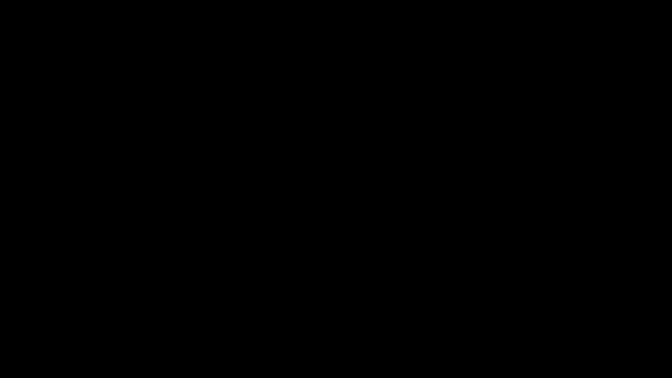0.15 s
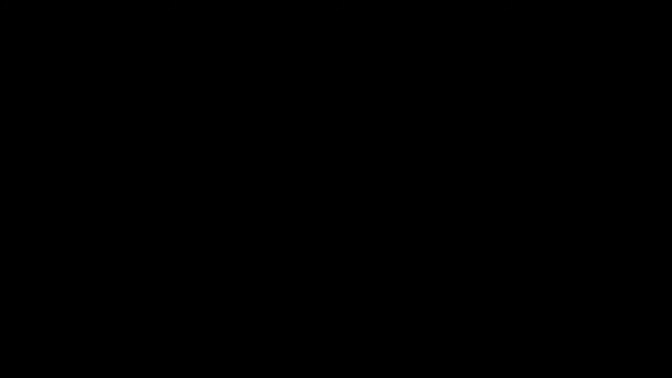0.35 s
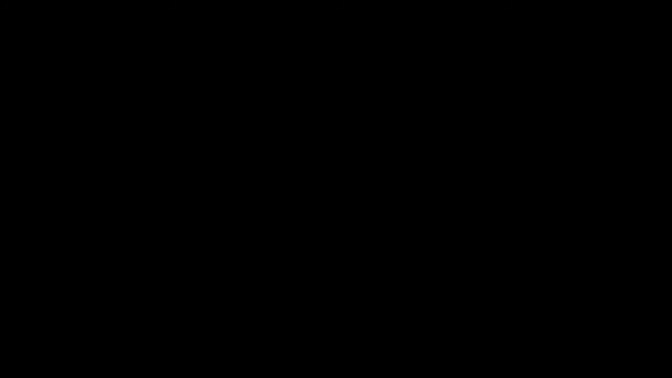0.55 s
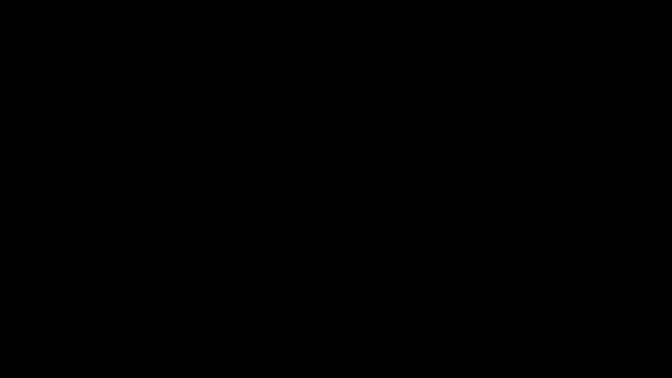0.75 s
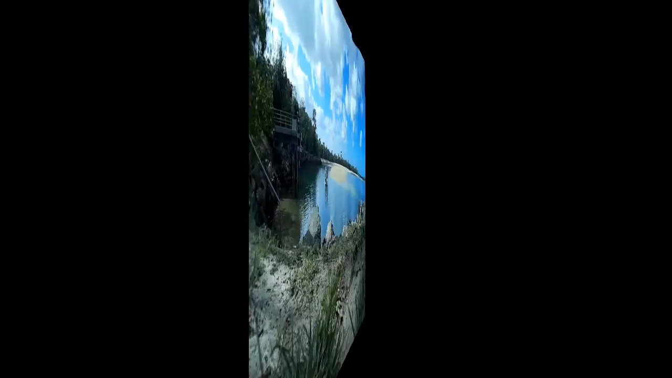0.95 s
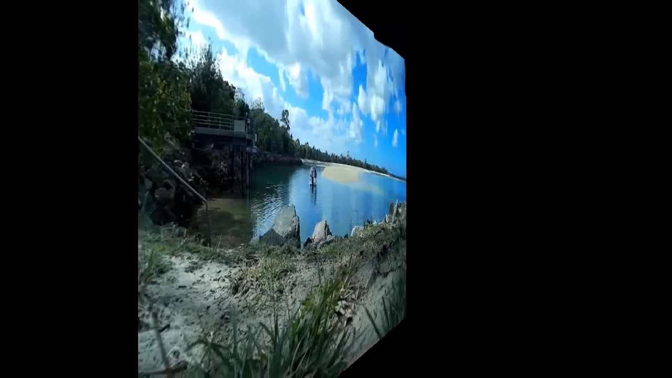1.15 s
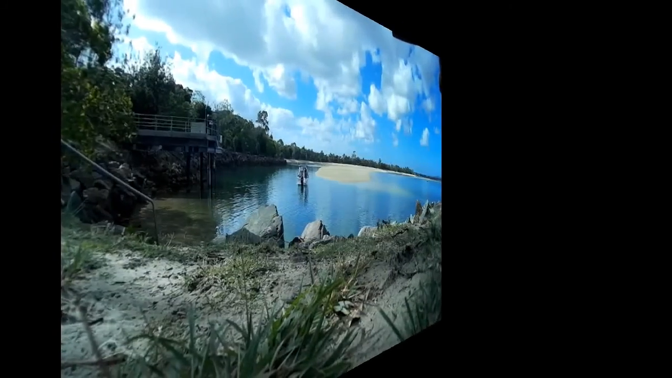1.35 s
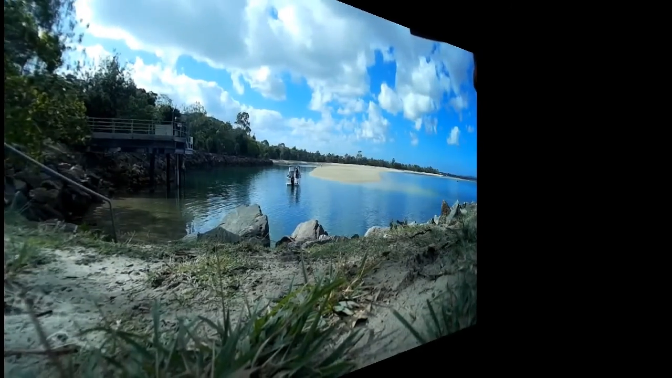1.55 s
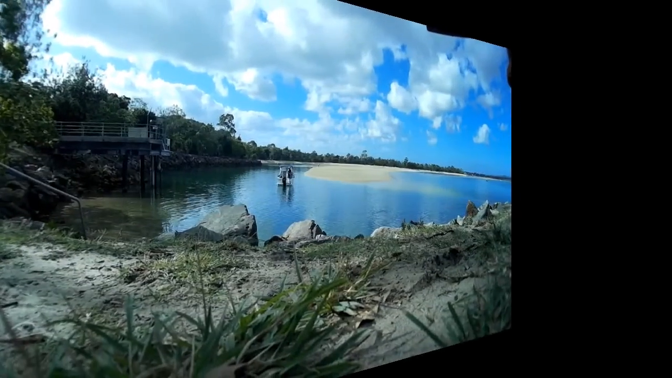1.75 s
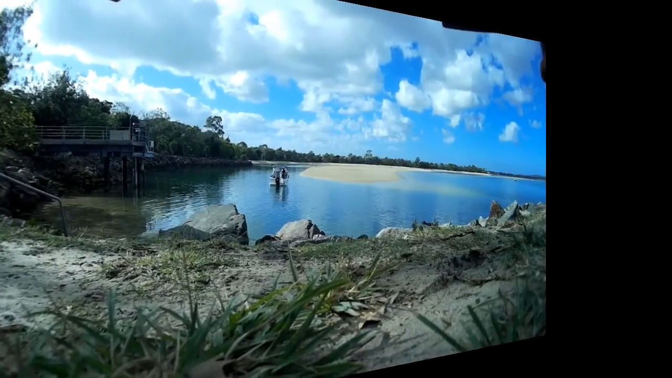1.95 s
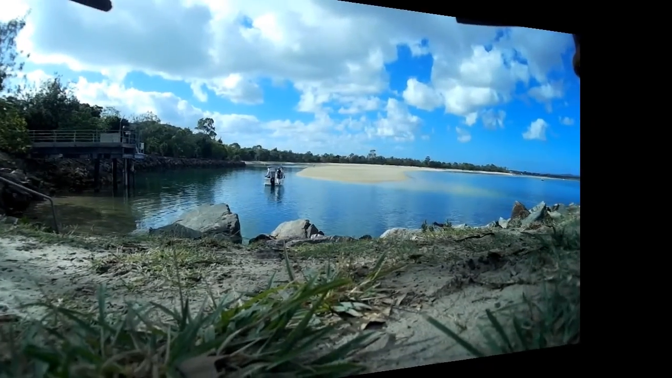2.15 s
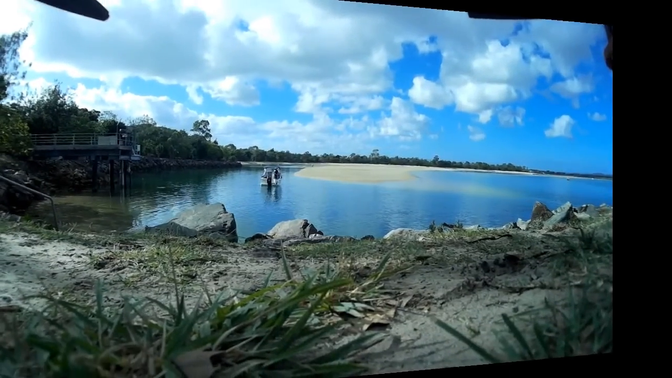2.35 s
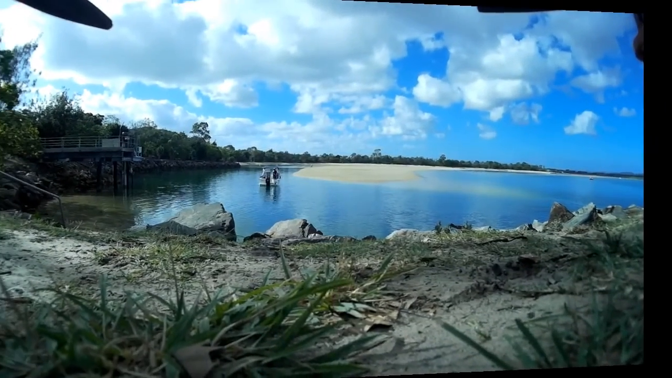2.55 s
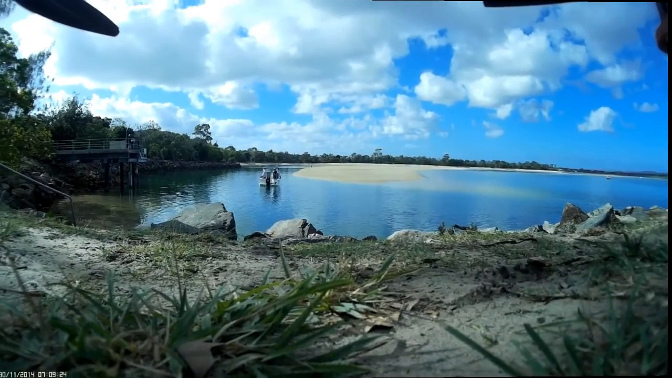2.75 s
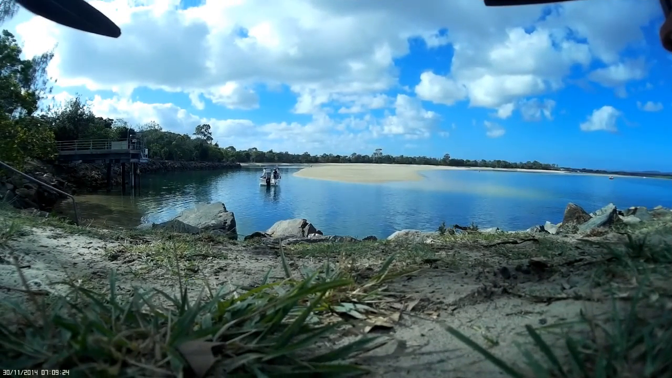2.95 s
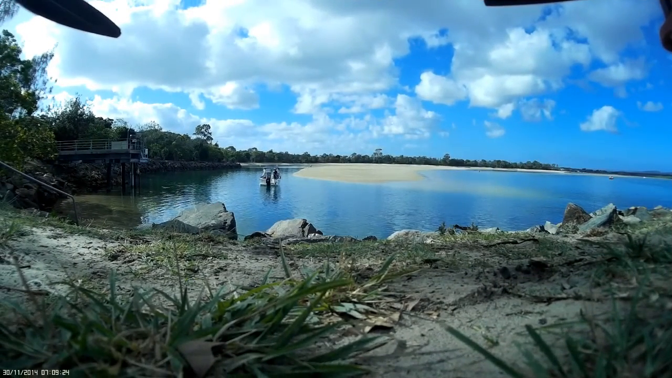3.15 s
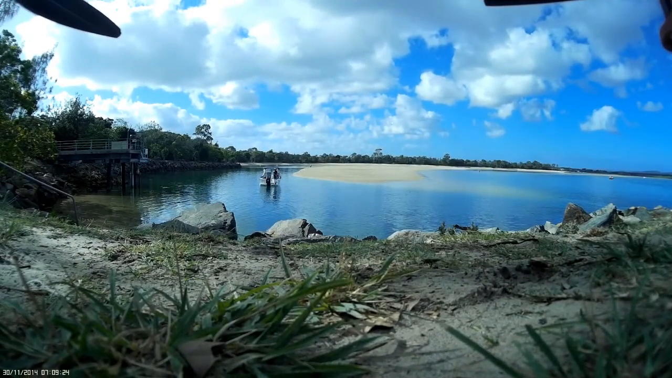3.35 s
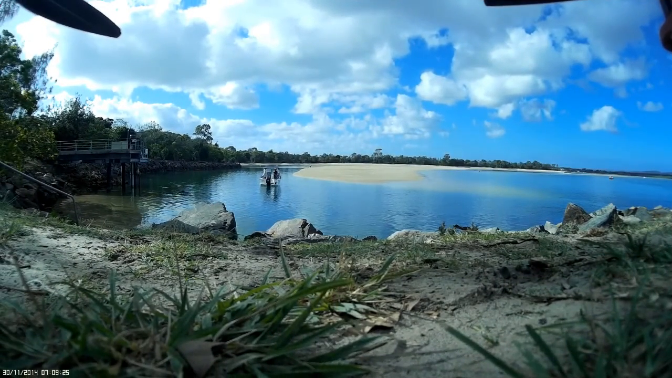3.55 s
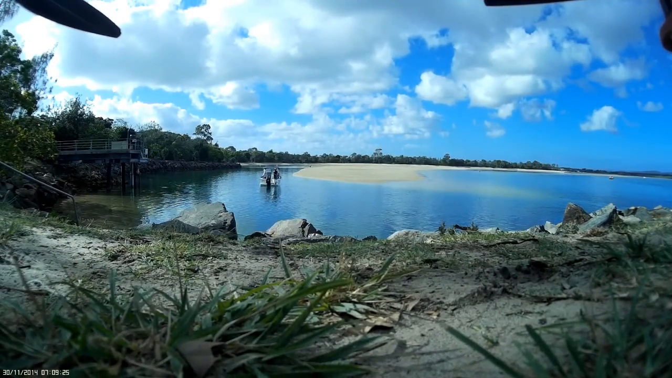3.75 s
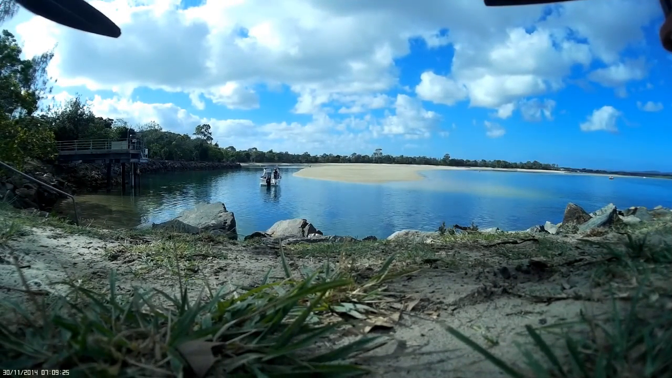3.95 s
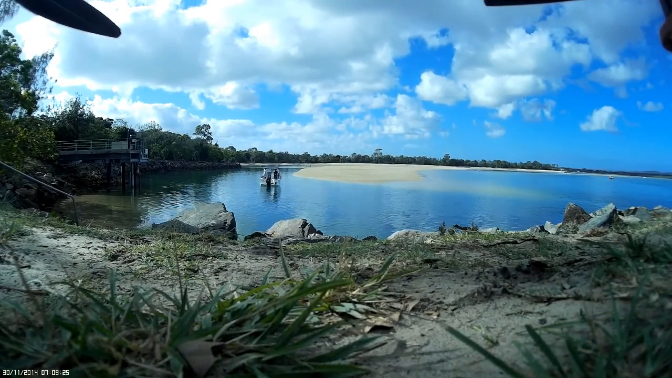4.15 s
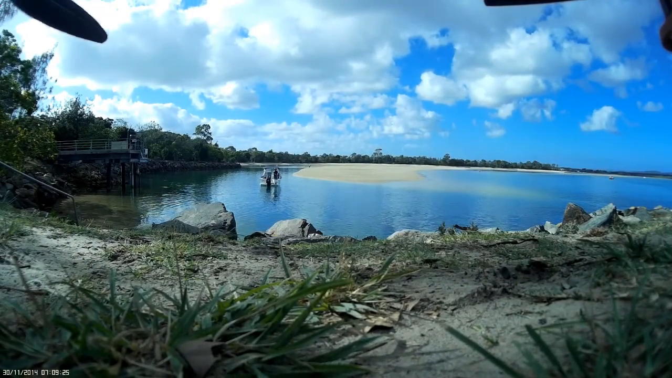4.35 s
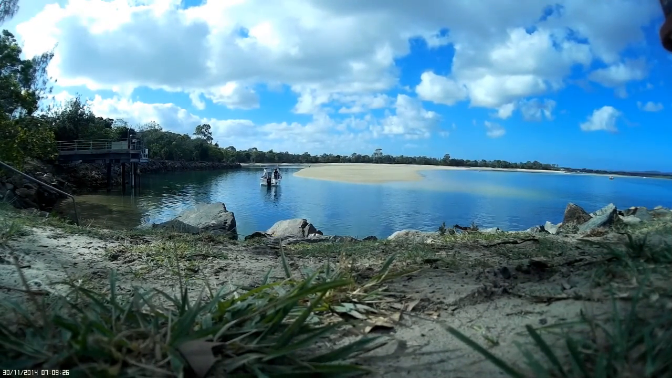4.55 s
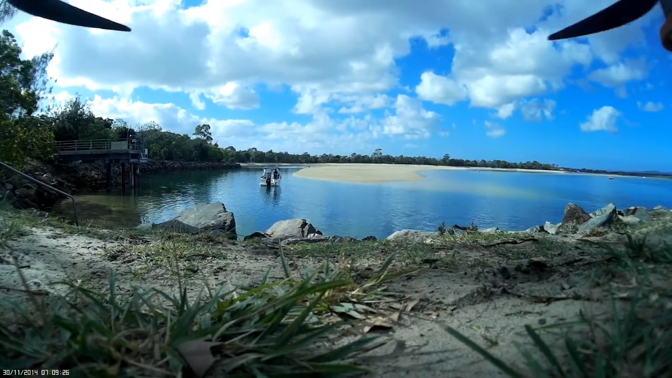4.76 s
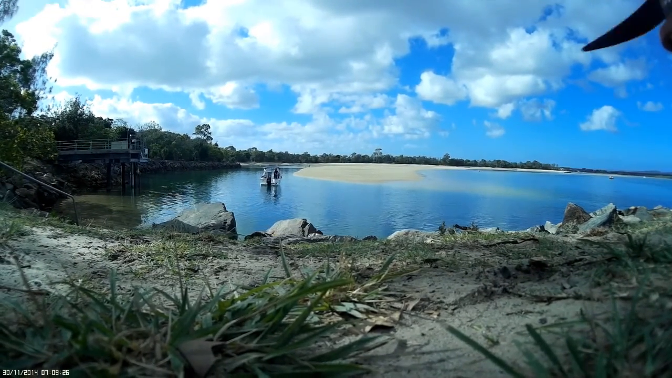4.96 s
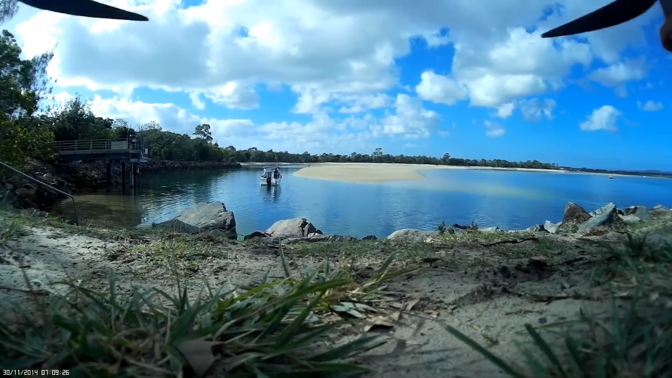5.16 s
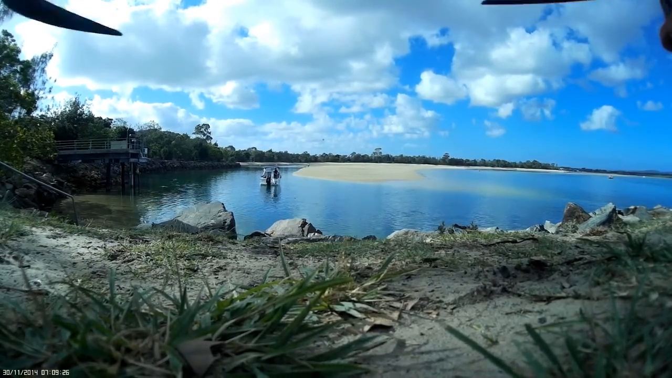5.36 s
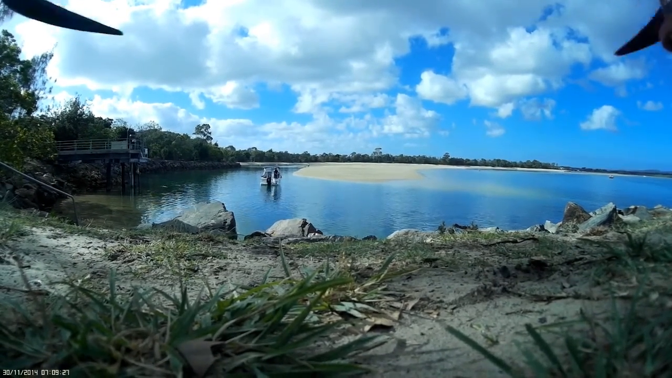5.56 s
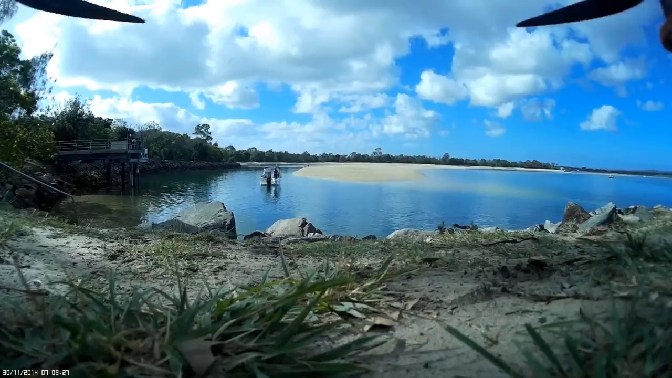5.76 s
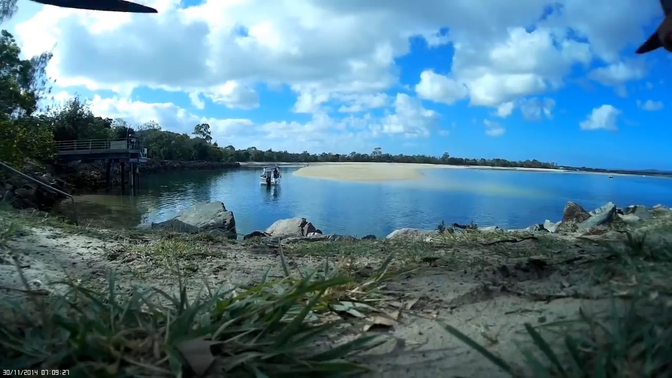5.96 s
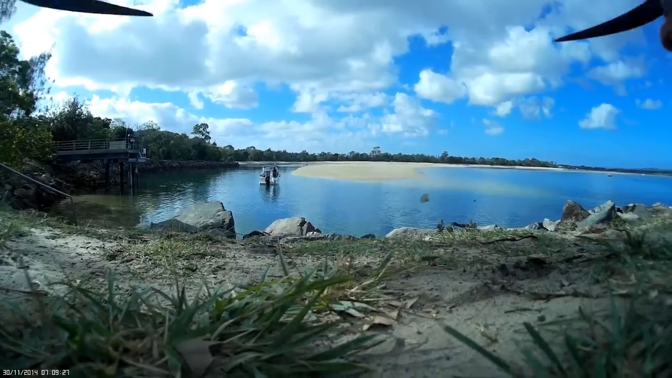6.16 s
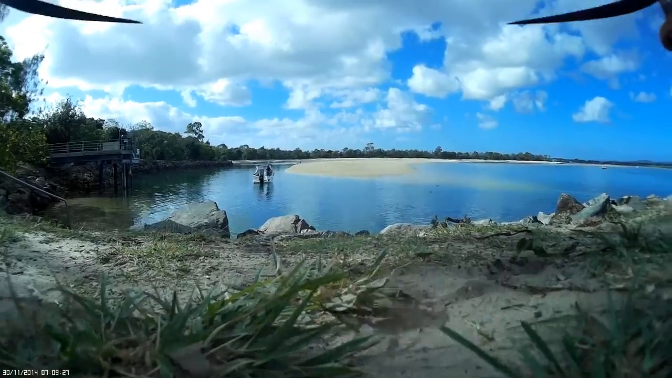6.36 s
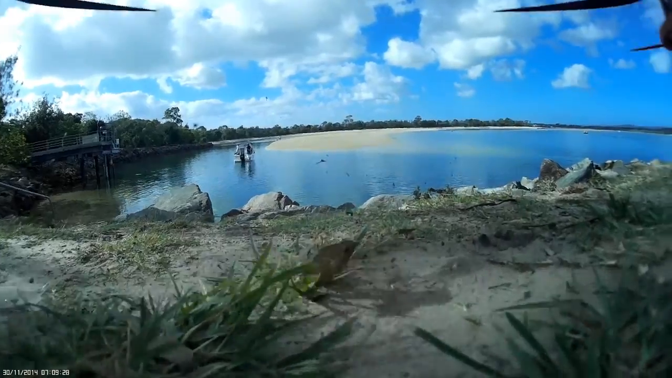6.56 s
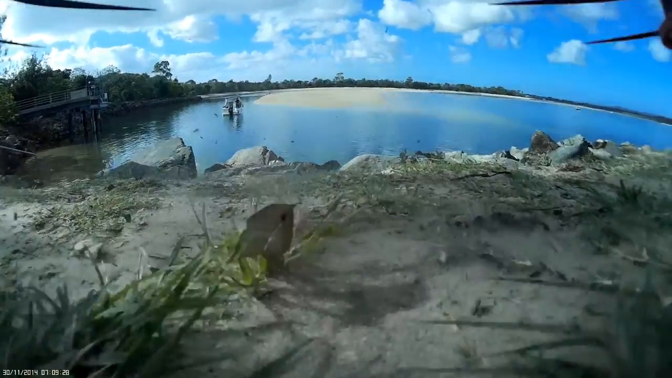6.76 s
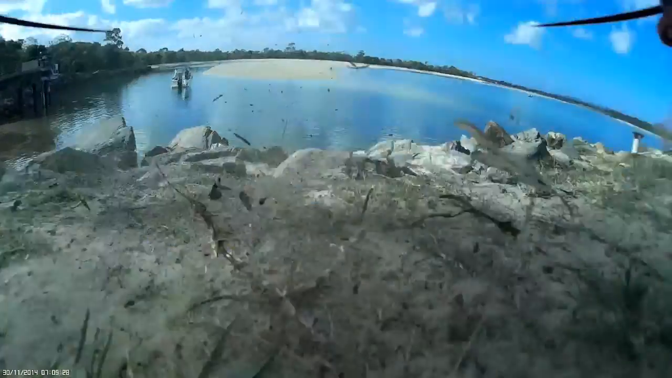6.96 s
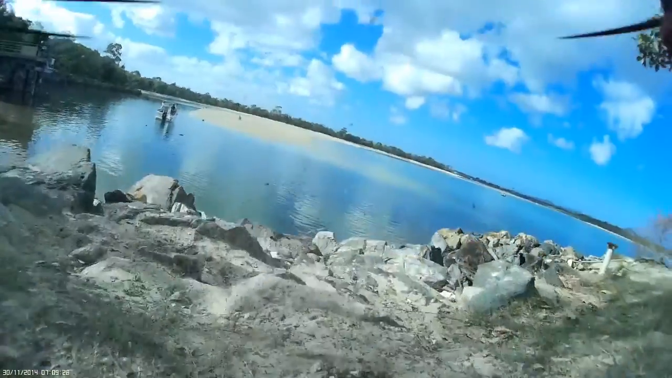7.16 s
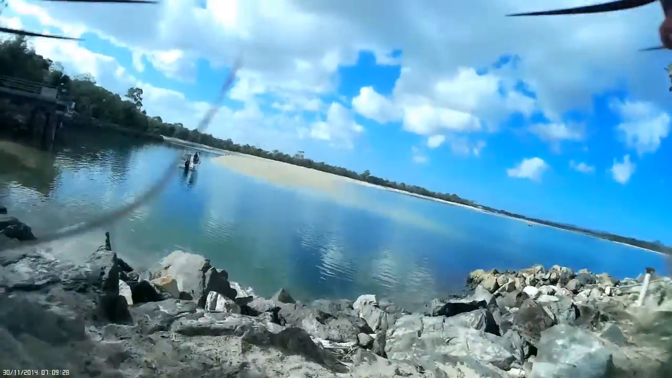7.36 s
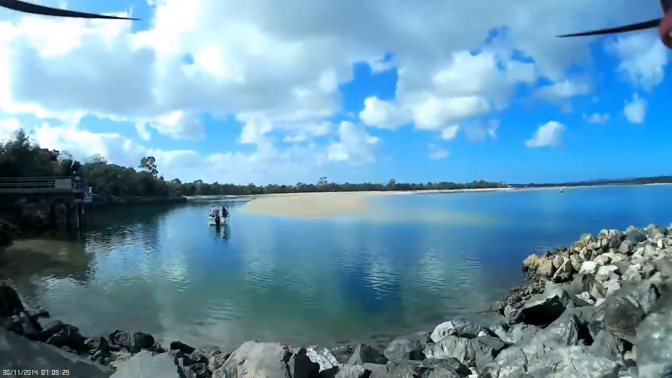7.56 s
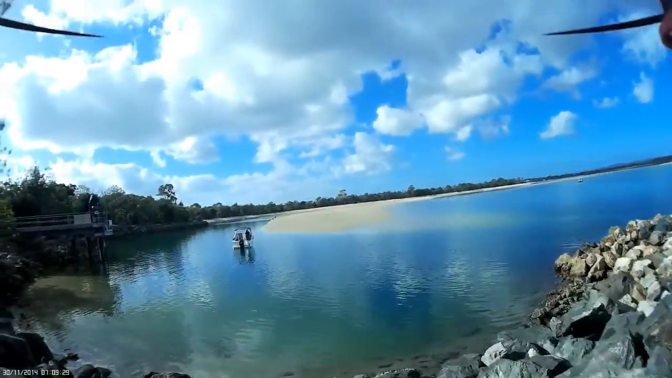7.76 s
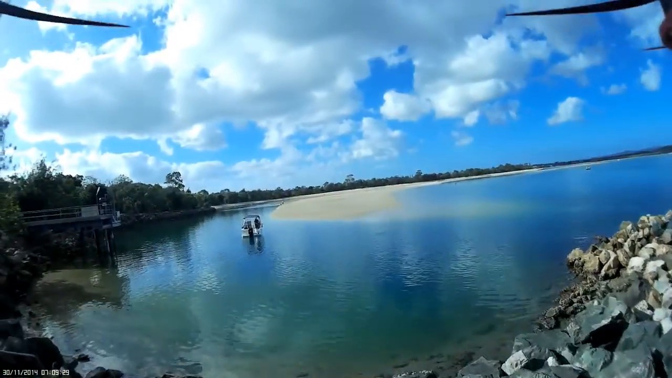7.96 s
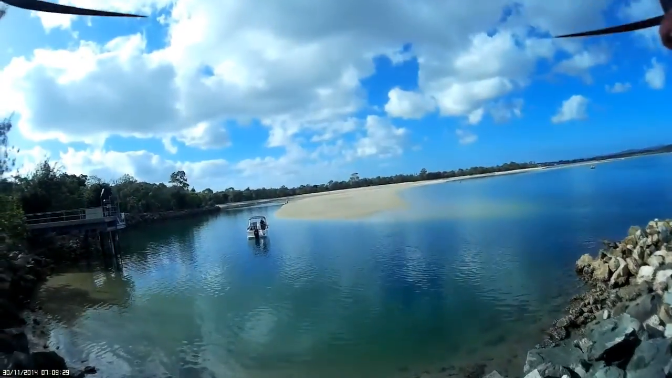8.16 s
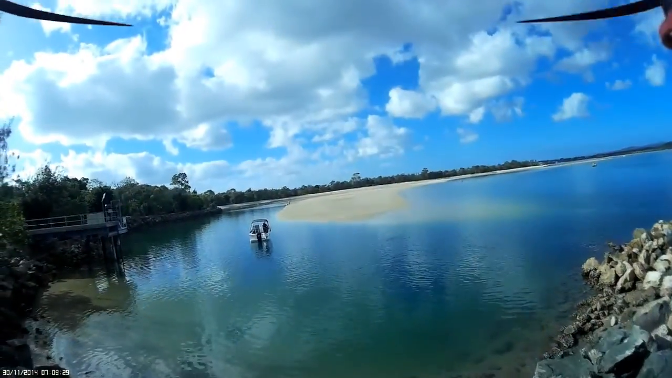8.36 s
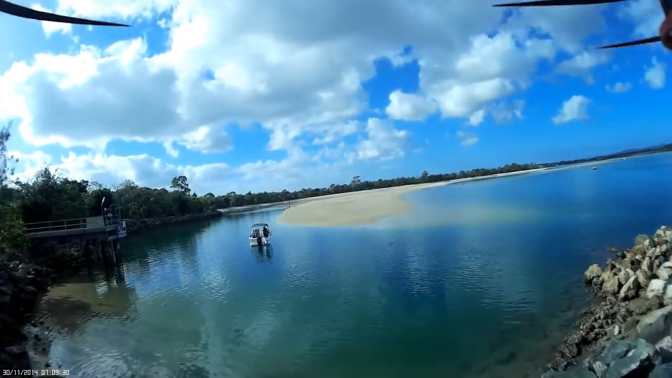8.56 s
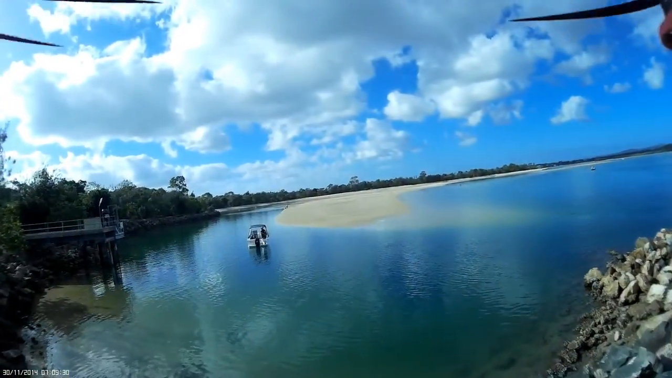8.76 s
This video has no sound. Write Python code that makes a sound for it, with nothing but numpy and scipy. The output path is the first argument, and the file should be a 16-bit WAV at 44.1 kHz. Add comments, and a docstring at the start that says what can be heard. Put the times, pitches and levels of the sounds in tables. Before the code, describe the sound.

Water splashes and a distant motorboat speeds up before a very close drone whines to life, takes off and hovers, buzzing.

```python
"""A far boat engine hums and speeds up while water laps and splashes on a sandy shore.
Then, right at the microphone, a small quadcopter wakes: its speed controllers whistle as they switch,
and the rotors spin up one after another, blades buzzing and magnets whining. The craft lifts through
its own downwash, which buffets the microphone of the camera it carries, and hovers with its rotors
beating against each other."""
import sys
import numpy as np
from scipy import signal
from scipy.fft import rfft, irfft, next_fast_len
from scipy.io import wavfile
from scipy.ndimage import uniform_filter1d, map_coordinates

SR = 44100
rng = np.random.default_rng(int(sys.argv[2]) if len(sys.argv) > 2 else 0)


def wav_record(signal):
    """Record a signal, one row per channel, as 16-bit PCM in the file named by sys.argv[1]."""
    frames = np.transpose(np.atleast_2d(signal))
    bounded = np.clip(frames, -1, 1)
    # unit amplitude maps onto the largest positive 16-bit level
    quanta = np.round(bounded * 32767).astype(np.int16)
    wavfile.write(sys.argv[1], SR, quanta)


N = 388962
t = np.arange(N) / SR


def amp(db):
    """Gain of a level in dB."""
    return 10 ** (np.asarray(db) / 20)


def unit(x):
    """Scaled to rms 1."""
    return x / np.sqrt(np.mean(x ** 2) + 1e-20)


def curves(rows):
    """One automation curve for each column after the time."""
    times, *columns = np.transpose(rows)
    return [np.interp(t, times, column) for column in columns]


def gate(start, end, fade):
    """1 from start to end, fading over `fade` seconds outside them."""
    return np.interp(t, [start - fade, start, end, end + fade], [0, 1, 1, 0])


def during(rows, fade):
    """A gate that is open while a table runs."""
    return gate(rows[0][0], rows[-1][0], fade)


def wobble(rate):
    """A smooth random curve, rate knots a second."""
    coarse = t[::64]
    knots = rng.standard_normal(int(N * rate / SR) + 4)
    return np.interp(t, coarse, map_coordinates(knots, [coarse * rate]))


def filtered(x, response):
    """x times a response of frequency."""
    size = next_fast_len(N + 8192)
    return irfft(rfft(x, size) * response(np.fft.rfftfreq(size, 1 / SR)), size)[..., :N]


def eq(x, curve, outside_db=None):
    """x through an EQ curve of (f/Hz, gain/dB) points."""
    f, db = np.transpose(curve)
    return filtered(x, lambda hz: amp(np.interp(np.log(hz + 1), np.log(f), db, outside_db, outside_db)))


def noise(spectrum, patchy_db):
    """Coloured noise of rms 1 with patches of random gain."""
    bins = signal.stft(rng.standard_normal(N), nperseg=512)[2]
    patches = uniform_filter1d(uniform_filter1d(rng.standard_normal(bins.shape), 6, 0), 12, 1)
    patchy = signal.istft(bins * amp(patchy_db * unit(patches)), nperseg=512)[1][:N]
    return unit(eq(patchy, spectrum, outside_db=-120))


def angle(hz):
    """Running phase of a moving frequency."""
    return 2 * np.pi * (np.cumsum(hz) / SR + rng.random())


def stack(phase, partials, flutter_db, drift, spread=1):
    """Fluttering multiples of a phase that drifts (radians); spread 0 lines them up as pulses."""
    phase = phase + drift * wobble(30)
    return np.sqrt(2) * sum(
        amp(db + flutter_db * wobble(13)) * np.cos(k * phase + spread * 2 * np.pi * rng.random())
        for k, db in partials)


# Colour of the camera case, and of the frame with its ringing arm (f/Hz, gain/dB)
CASE_EQ = [(40, 0), (600, -3), (1000, -4), (1700, -6.5), (2200, -7), (2800, -25), (20000, -10)]
ARM_EQ = [(1800, -35), (2100, -42), (3000, -43), (3600, -32), (4150, -21), (4600, -31), (4900, -33),
          (5500, -50)]


def rotor(moves, overtones, whines, tone_db, whine_db, drift, shake):
    """Blade tone that swells with speed, overtones, and magnet whine that follows the current."""
    hz, db = curves(moves)
    phase = angle(hz)
    swell_db = 5.5 * np.log2(hz / 201)  # per octave from hover speed
    tone = amp(db + tone_db + swell_db) * np.sqrt(2) * np.sin(phase)
    buzz = eq(amp(db) * stack(phase, overtones, flutter_db=2.5, drift=drift), CASE_EQ)
    octaves_per_s = uniform_filter1d(np.gradient(np.log2(hz)) * SR, int(.08 * SR))
    coasting_db = 15 * np.minimum(octaves_per_s, 0)  # a slowing motor whines less
    current_db = .6 * (curves(WHISTLE_FADER)[0] + 28)  # whine and whistle rise together
    arm_db = np.interp(whines[0][0] * hz, *np.transpose(ARM_EQ))
    whine = stack(phase, whines, flutter_db=1.5, drift=shake)
    whine *= amp(whine_db + coasting_db + current_db + arm_db)
    return during(moves, .026) * (tone + buzz + whine)


# Two rotors spinning up (t/s, blade rate f/Hz, level/dB)
FIRST_ROTOR = [(4.95, 83.6, -39), (5.1, 112.1, -30.5), (5.21, 124.5, -26), (5.41, 135.3, -26.5),
               (5.86, 139.8, -27), (5.94, 148.3, -26), (6.14, 176.5, -24), (6.35, 224.7, -19),
               (6.46, 231.1, -24.5), (6.6, 215, -24), (6.68, 201, -35)]
SECOND_ROTOR = [(6.3, 96, -28.5), (6.48, 138.1, -27), (6.6, 152, -26.5), (6.75, 212.5, -32.5),
                (6.86, 223.7, -30), (6.94, 260.6, -23.5), (7, 274.6, -20), (7.06, 265.9, -34)]
# Blade overtones, the halves from unequal blades (multiple of blade rate, level/dB)
RISING_BLADES = [(.5, -10), (1.5, -15), (2, -4), (2.5, -20), (3, 0.5), (4, -4), (5, -4.5), (6, -7), (7, -7),
                 (8, -5.5), (9, -14), (10, -8), (11, -34), (12, -40)]
# Magnet whine, about 42 steps a turn (multiple of blade rate, level/dB)
RISING_WHINE = [(21.27, 1.5), (21, -16), (21, -13), (18.7, -8)]


def rising_rotors():
    """Two rotors climb in pitch, one after the other."""
    return sum(rotor(moves, RISING_BLADES, RISING_WHINE, tone_db, whine_db, drift=.035, shake=.02)
               for moves, tone_db, whine_db in [(FIRST_ROTOR, 4, 0), (SECOND_ROTOR, 11, -15)])


# Rotors in flight, each while it stands out (t/s, blade rate f/Hz, level/dB)
LEFT_ROTOR = [(7.02, 238.1, -18), (7.1, 238.3, -24.5), (7.17, 257.4, -23.5), (7.3, 256.7, -28),
              (7.4, 241.5, -24.5), (7.6, 209.5, -27.5), (7.7, 202.9, -26), (7.9, 195.7, -27),
              (8, 197.1, -26), (8.2, 183.8, -25), (8.4, 178.2, -26), (8.82, 184.7, -25)]
RIGHT_ROTOR = [(7.08, 180.8, -21), (7.2, 183.7, -35), (7.4, 192.2, -32.5), (7.47, 217.3, -32),
               (7.55, 222, -29.5), (7.65, 216.7, -31.5), (7.9, 225.8, -27.5), (8.1, 200.3, -29),
               (8.3, 191.8, -28), (8.55, 190.3, -27.5), (8.82, 192.3, -24)]
REAR_ROTOR = [(8.42, 196.8, -41), (8.55, 198.3, -30), (8.82, 202, -35)]
# Blade overtones and magnet whine clear of the ground (multiple of blade rate, level/dB)
HOVER_BLADES = [(.5, -11), (1.5, -11), (2, -1), (2.5, -24), (3, -5), (4, -6), (5, -10), (6, -11), (7, -6),
                (8, -8), (9, -6), (10, -9)]
HOVER_MAGNETS = [(20.76, -10), (19.9, -13), (21.47, -4.5), (20.54, -2), (21.42, -20.5)]


def hovering_rotors():
    """Rotors at nearby speeds beat against each other."""
    voices = [(LEFT_ROTOR, 9, -11), (RIGHT_ROTOR, 10, -6), (REAR_ROTOR, 9, -16)]
    return sum(rotor(moves, HOVER_BLADES, HOVER_MAGNETS, tone_db, whine_db, drift=.025, shake=.05)
               for moves, tone_db, whine_db in voices)


# Fader ride of the controllers' whistle (t/s, level/dB)
WHISTLE_FADER = [(4.42, -34), (4.5, -22), (4.54, -30), (4.66, -20.5), (4.69, -24.5), (4.79, -21),
                 (4.81, -31), (5.26, -28), (5.35, -36), (5.39, -25), (5.42, -29), (6.0, -29.5), (6.02, -25),
                 (6.1, -28.5), (6.17, -19), (6.59, -34), (6.63, -55), (7.19, -37), (8.54, -26),
                 (8.82, -29.5)]
# Switching tones (f/Hz, level/dB)
SWITCH_TONES = [(8046, -2), (8063, -9.5), (8100, -8)]
# Forced start of the motors (t/s, coil rate f/Hz)
START_RAMP = [(4.48, 59.8), (4.6, 336), (4.8, 1050)]
# The current drops out (from t/s, to t/s)
DROPOUTS = [(4.436, 4.36), (4.461, 4.46), (4.52, 4.527)]
# Sidebands of the whistle in flight (offset in shaft rates, level/dB)
SHAFT_SIDEBANDS = [(-6, -9), (-4, -13), (-3, -8), (-2, 2), (-1, -1), (0, 4), (1, -3), (2, -2), (3, -11),
                   (4, -10), (5, -16), (6, -7), (7, -7), (8, -11), (10, -12)]


def controllers():
    """Switching current whistles: it stutters at the start and spreads into a comb in flight."""
    whistle = unit(sum(amp(db + 1.5 * wobble(27)) * np.sin(angle(hz + 2.01 * wobble(7.4)))
                       for hz, db in SWITCH_TONES))
    coil = angle(curves(START_RAMP)[0])
    tremolo = 1 + during(START_RAMP, .01) * (.22 * np.cos(coil) + .16 * np.cos(coil / 2))
    stutter = 1 - 1.1 * sum(gate(start, end, .001) for start, end in DROPOUTS)
    thin_tone = amp(-22 + 2.5 * wobble(25.28)) * np.sin(angle(2630 + 15 * wobble(3.1)))
    starting = (tremolo * whistle + gate(4.55, 5.9, .05) * thin_tone) * stutter
    shaft = angle(curves(RIGHT_ROTOR)[0]) / 2
    carrier = angle(8200 + 9 * wobble(25))
    comb = unit(sum(amp(db + 2.6 * wobble(20)) * np.sin(carrier + k * shaft + 2 * np.pi * rng.random())
                    for k, db in SHAFT_SIDEBANDS))
    flying = during(RIGHT_ROTOR, .42)
    level = amp(curves(WHISTLE_FADER)[0] + 1.5 * wobble(18)) * during(WHISTLE_FADER, .002)
    return level * ((1 - flying) * starting + flying * comb)


# Coil sidebands round the whistle (offset in blade rates, level/dB)
COIL_SIDEBANDS = [(-14, -44), (-7, -40), (7, -39)]
# Chirp of a revving motor (t/s, f/Hz, level/dB)
REV_CHIRP = [(4.96, 3220, -32), (4.972, 3140, -38), (5.002, 3713, -24.5), (5.074, 4390, -36),
             (5.116, 4840, -30), (5.15, 4710, -53)]
# First pushes of the coils (t/s, level/dB)
COIL_TICKS = [(4.4201, -47), (4.4504, -50), (4.4672, -44), (4.4824, -49), (4.5264, -47)]


def motor_start():
    """The coils tick, a motor revs with a chirp, and coil and slot tones track the first rotor."""
    blade = angle(curves([(4.6, 10, 0)] + list(FIRST_ROTOR))[0])
    carrier = angle(np.full(N, SWITCH_TONES[0][0]))
    coils = sum(amp(db + 3 * wobble(20)) * np.sin(carrier + k * blade) for k, db in COIL_SIDEBANDS)
    slots = amp(-41 + 4 * wobble(8)) * np.sin(35 * blade)
    rev_hz, rev_db = curves(REV_CHIRP)
    chirp = stack(angle(rev_hz + 60 * wobble(120)), [(.5, -3), (1, 0)], flutter_db=4, drift=.4)
    chirp *= amp(rev_db - 2) * during(REV_CHIRP, .0089)
    ticks = sum(amp(db - 60 * np.abs(t - at) / .012) * (t >= at) for at, db in COIL_TICKS)
    ticks *= unit(np.diff(rng.standard_normal(N + 1)))
    return gate(4.95, 6.15, .15) * coils + gate(5.2, 5.86, .08) * slots + chirp + ticks


# Fader rides of the air (t/s, downwash level/dB, rush level/dB, treble level/dB)
AIR_FADERS = [(4.42, -49, -55, -42.5), (4.73, -56, -36, -30), (4.91, -45, -35.5, -37),
              (5.04, -47, -31.5, -27), (5.28, -34.5, -28.5, -29), (5.82, -36, -28, -28.5),
              (5.94, -31.5, -27, -25.5), (6.09, -37, -24.5, -24), (6.21, -27, -21.5, -20.5),
              (6.37, -28.5, -24.5, -21), (6.49, -22, -25, -22), (6.53, -29, -24, -22),
              (6.7, -15.5, -24.5, -28.5), (6.91, -9.5, -16.5, -23), (6.99, -5.5, -14, -17),
              (7.07, -14, -17, -24.5), (7.16, -13, -17, -23.5), (7.23, -29.5, -24.5, -27),
              (7.67, -28.5, -23, -29), (7.83, -23, -24.5, -28), (7.9, -38, -27.5, -30),
              (7.94, -34, -26.5, -31.5), (8.27, -31, -28.5, -29.5), (8.57, -35, -25.5, -28.5),
              (8.71, -23, -25.5, -29.5), (8.82, -25, -24.5, -28)]
# Gusts thrown back from the ground (t/s, boost/dB)
GROUND_GUSTS = [(5.23, 8.5), (5.87, 2), (6.27, 3.5), (6.39, 4), (6.55, 5.5), (6.77, 2.5), (6.939, 6.5),
                (7.83, 4), (7.92, 10)]
# Deep buffeting and low-mid flapping (f/Hz, level/dB)
BUFFET_EQ = [(12, -28), (25, -2), (50, -2), (90, -5.5), (150, -8.5), (300, -41)]
FLAP_EQ = [(50, -57), (100, 3), (200, 3), (400, 0), (700, -5), (1100, -14), (1500, -37)]


def downwash():
    """Rotor wind buffets the microphone; the flapping eases clear of the ground."""
    wash_db = curves(AIR_FADERS)[0]
    gust_db = sum(db * np.exp(-((t - at) / .038) ** 2) for at, db in GROUND_GUSTS)
    flying = during(RIGHT_ROTOR, .3)
    lumps = amp(.3 * wobble(9))
    flap = amp(-7.5 + .57 * wash_db - 8 * flying) * unit(lumps * noise(FLAP_EQ, patchy_db=2))
    buffet = amp(wash_db) * unit(lumps * noise(BUFFET_EQ, patchy_db=3.5))
    return gate(4.58, AIR_FADERS[-1][0], .61) * amp(gust_db) * (buffet + flap)


# Midrange rush near the ground, and thinner in flight (f/Hz, level/dB)
GROUND_RUSH_EQ = [(500, 8), (800, 8), (1050, 6), (1500, 3.5), (1800, 8), (2500, 0.5), (3200, -32),
                  (4200, -42)]
FLIGHT_RUSH_EQ = [(600, -17), (900, -4), (1300, 4), (1800, 5), (2500, -5.5), (3200, -30), (4200, -42)]
# Treble: coil rasp before the blades bite, hiss, top fizz, switching jitter (f/Hz, level/dB)
RASP_EQ = [(1590, -47), (2700, -9.5), (2860, -20), (3350, -10.5), (4100, 0.5), (5440, -12.5), (5840, -6),
           (6720, -13), (7400, -7), (9620, -23), (16300, -120)]
HISS_EQ = [(1530, -25), (2600, -0.5), (3430, 1.5), (3990, 3), (5240, -6.5), (5820, -4), (6660, -8.5),
           (7400, -8), (9620, -78), (16300, -120)]
FIZZ_EQ = [(6600, -60), (7200, -14.5), (7700, 2), (8400, -4), (9500, -2.5), (11000, -11.5), (12200, -12),
           (13300, -17), (15700, -26)]
JITTER_EQ = [(7500, -46), (7900, 1), (8080, 1), (8300, 1), (8800, -38)]


def turbulence():
    """Rush and hiss chopped by the passing blades, under a bright fizz."""
    _, rush_db, treble_db = curves(AIR_FADERS)
    blade_hz = np.where(t < FIRST_ROTOR[-1][0], curves(FIRST_ROTOR)[0], curves(LEFT_ROTOR)[0])
    chop = 1 + .33 * np.cos(angle(blade_hz))
    early, flying = gate(4.42, 4.95, .25), during(RIGHT_ROTOR, .3)
    hiss = early * noise(RASP_EQ, patchy_db=3.5) + (1 - early) * noise(HISS_EQ, patchy_db=1.1)
    jitter = amp(5.5) * gate(4.42, 6.6, .094) * noise(JITTER_EQ, patchy_db=3)
    fizz = amp(treble_db - 9.5 + .5 * flying) * (noise(FIZZ_EQ, patchy_db=2) + jitter)
    rush = (1 - flying) * noise(GROUND_RUSH_EQ, patchy_db=3.5)
    rush += flying * noise(FLIGHT_RUSH_EQ, patchy_db=2)
    return during(AIR_FADERS, .0064) * (chop * (amp(rush_db) * rush + amp(treble_db) * hiss) + fizz)


# The boat's throttle (t/s, firing rate f/Hz, level/dB)
THROTTLE = [(.79, 47.8, -51), (1.05, 52.3, -53), (1.6, 63.5, -47), (1.85, 57, -43), (2.27, 51.7, -44),
            (2.76, 50.4, -52), (2.86, 51.9, -40.5), (3.02, 59.1, -33), (3.31, 60.8, -34),
            (4.05, 64.7, -31.5), (4.38, 70.54, -30.5), (5.3, 79.9, -26), (5.8, 77.3, -33.5),
            (6.05, 81.1, -35), (6.3, 76.24, -32)]
# Overtones at full load (multiple of firing rate, level/dB)
FIRING_OVERTONES = [(2, -11), (3, -5), (4, -10.5), (5, -9), (6, -20.5), (7, -39)]
# The overtones grow with the load (t/s, gain/dB)
LOAD_FADER = [(2.8, -19), (3, -1), (4.05, 0), (5, -12.5)]
# Engine roar (f/Hz, level/dB)
ROAR_EQ = [(60, -38), (90, -15), (190, -14.5), (290, -5), (400, -6), (770, -17), (1100, -13.5), (1300, -23),
           (1740, -14.5), (2200, -30.5), (2820, -38.5), (4000, -31), (5080, -30.5), (7890, -46.5),
           (15600, -53.5)]
# Exhaust pipe resonances (f/Hz, width/Hz, level/dB)
EXHAUST_PEAKS = [(669.5, 39, -11), (1077, 47, -17)]


def boat_engine():
    """Firing pulses hum under a roar that rings in the exhaust pipe."""
    hz, db = curves(THROTTLE)
    phase = angle(hz)
    hum = amp(.6 * wobble(14)) * np.sqrt(2) * np.cos(phase)
    load = amp(curves(LOAD_FADER)[0])
    pulses = load * stack(phase, FIRING_OVERTONES, flutter_db=-.5, drift=.037, spread=0)
    pipes = sum(amp(level) * noise([(f - 3 * width, -40), (f, 0), (f + 3 * width, -40)], patchy_db=5)
                for f, width, level in EXHAUST_PEAKS)
    roar = amp(-2) * (noise(ROAR_EQ, patchy_db=.9) + pipes)
    return amp(db) * during(THROTTLE, .2) * (hum + pulses + roar)


# Splash cues (t/s, slosh level/dB, spray level/dB)
SPLASH_CUES = [(.9, -47.5, -53.5), (.974, -47.5, -57.5), (1.69, -35, -32.5), (1.748, -29.5, -40.5),
               (1.896, -40, -46.5), (2.11, -45, -54), (2.366, -49, -54.5), (3.93, -42, -47),
               (4, -42, -45.5)]
# Body and bright top of a splash (f/Hz, level/dB)
SLOSH_EQ = [(180, -49), (300, 9.5), (324, -17), (382, -3), (694, 3.5), (771, 2.5), (1780, 3.5), (3000, -23),
            (3900, -51), (6600, -120)]
SPRAY_EQ = [(1410, -24), (2400, -6), (2840, -10), (4040, -1), (4300, -5), (9910, -20.5), (12500, -33),
            (13100, -38), (15000, -35)]


def splashes():
    """Each splash rises fast and its spray dies sooner than its slosh; the water squeaks once."""
    onsets, slosh_db, spray_db = np.transpose(SPLASH_CUES)[:, :, None]
    age = np.maximum(t - onsets, 0)
    attack = 1 - np.exp(-age / .0028)

    def envelope(db, t60_s):
        """Overlapping splashes add in power."""
        return np.sqrt(np.sum((amp(db - 60 * age / t60_s) * attack) ** 2, axis=0))

    slosh = envelope(slosh_db, t60_s=.91) * noise(SLOSH_EQ, patchy_db=.8)
    spray = envelope(spray_db, t60_s=.48) * noise(SPRAY_EQ, patchy_db=.8) * amp(1.2 * wobble(90))
    squeak = noise([(5000, -30), (5300, 0), (5600, -30)], patchy_db=0)
    squeak *= amp(-57) * np.exp(-((t - 2.13) / .04) ** 2)
    return slosh + spray + squeak


# Fader ride (t/s, level/dB) and colour (f/Hz, level/dB) of the bay's murmur
BAY_FADER = [(.79, -47.5), (1.5, -47.5), (2.8, -44.5), (4.4, -41)]
BAY_EQ = [(12, -55), (20, -33), (49, 3), (70, -4.5), (88, -11), (153, -5.5), (239, -9), (290, -13),
          (453, -10.5), (492, -14), (1140, -16), (1880, -21.5), (2690, -39), (4970, -37.5), (15600, -49.5)]


def bay():
    """A slowly swelling bed of murmur with one faint, far tone."""
    drone = amp(-53 + 2 * wobble(7.3)) * np.sqrt(2) * np.sin(angle(291 + 3.4 * wobble(7.2)))
    return drone + amp(curves(BAY_FADER)[0]) * noise(BAY_EQ, patchy_db=1.6)


def scene():
    """Shore and craft in mono, cutting in after a short silence."""
    shore = boat_engine() + bay() + splashes()
    craft = rising_rotors() + hovering_rotors() + controllers() + motor_start()
    air = turbulence() + downwash()
    cut_in = np.clip((t - .788) / .001, 0, 1)
    return ((shore + craft + air) * cut_in)[None]


def record(dry):
    """The input stage flattens the highest swings; nothing stays above the band limit."""
    ceiling, top_hz = .79, 15735
    flattened = dry / (1 + np.abs(dry / ceiling) ** 8) ** (1 / 8)
    return filtered(flattened, lambda hz: hz < top_hz)


dry = scene()
out = record(dry)
wav_record(out)
```